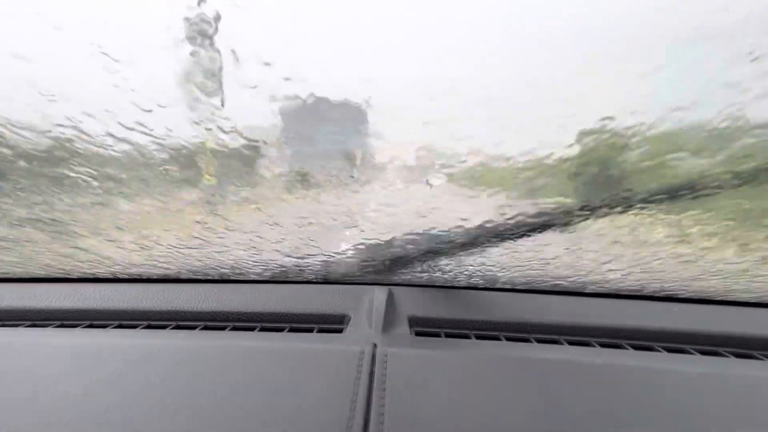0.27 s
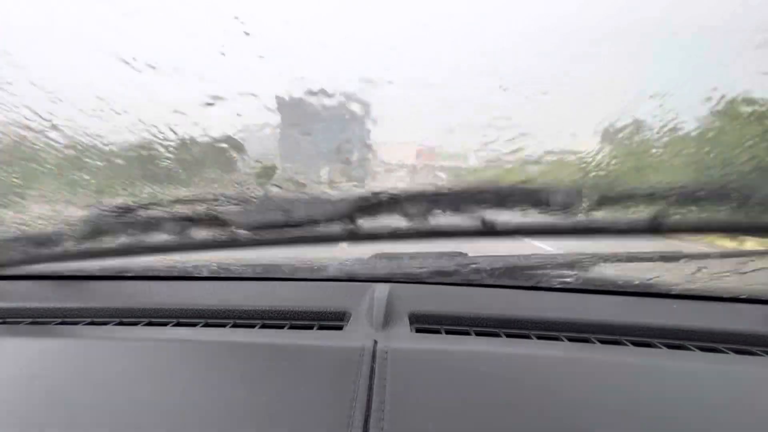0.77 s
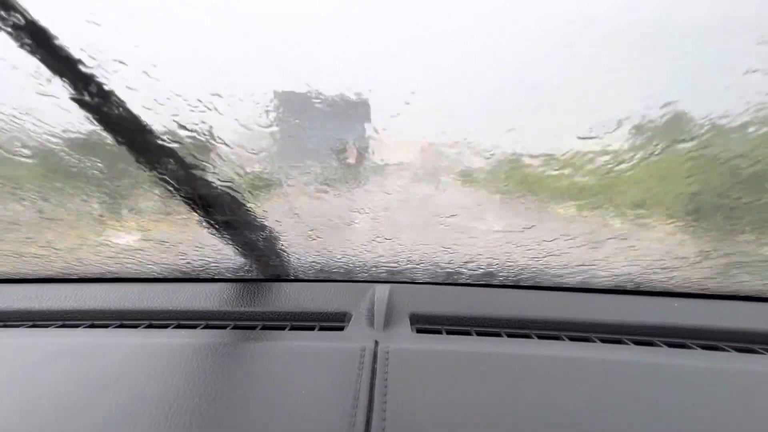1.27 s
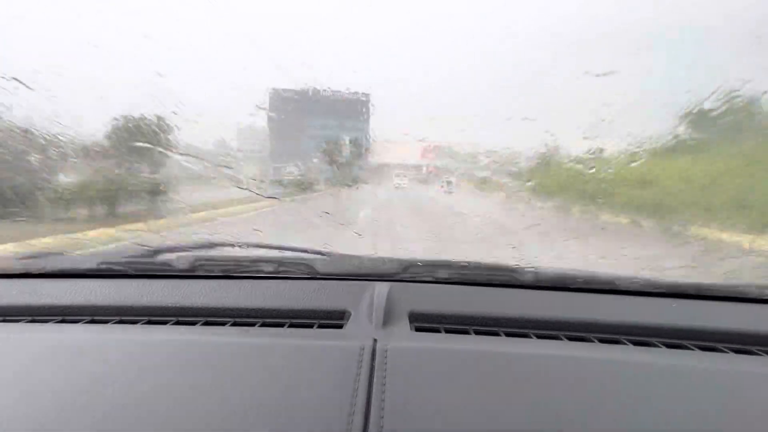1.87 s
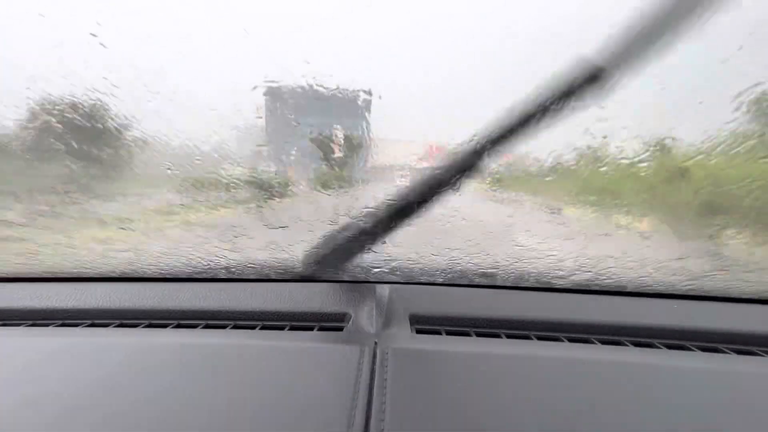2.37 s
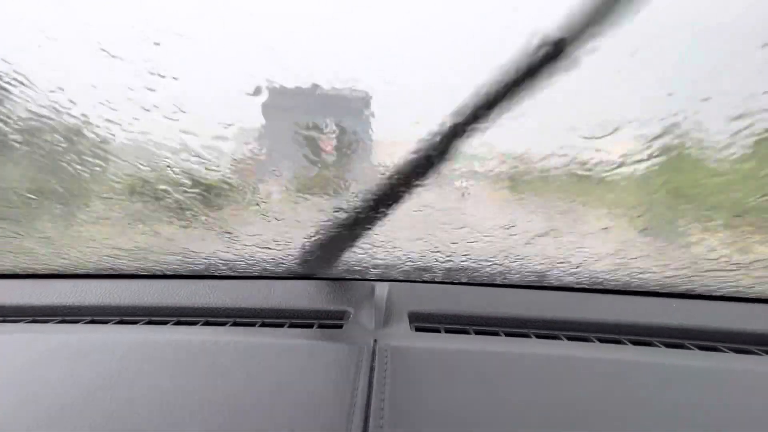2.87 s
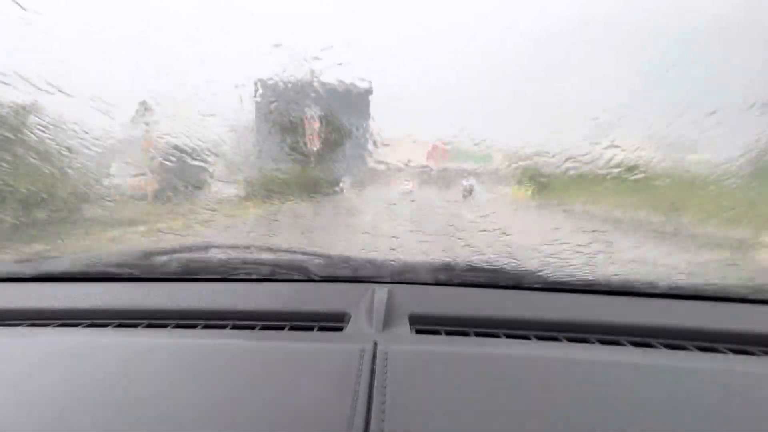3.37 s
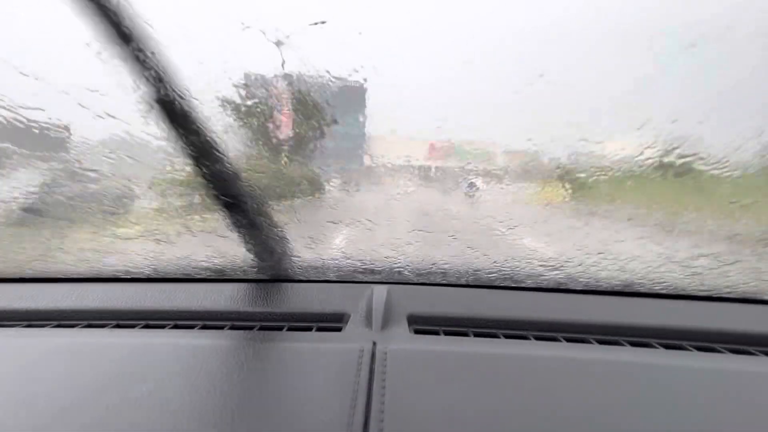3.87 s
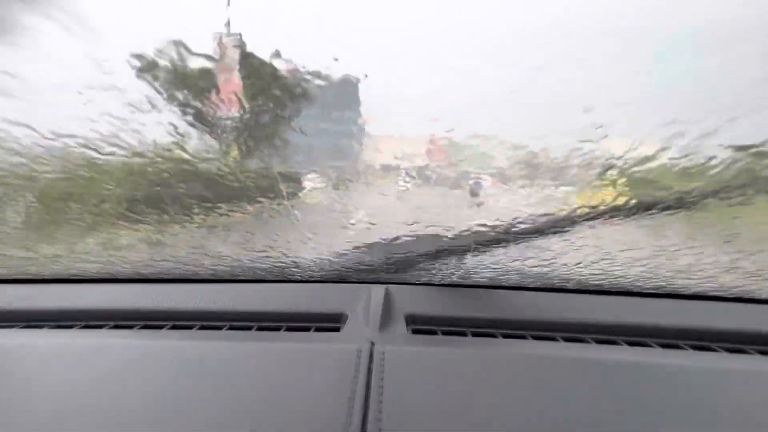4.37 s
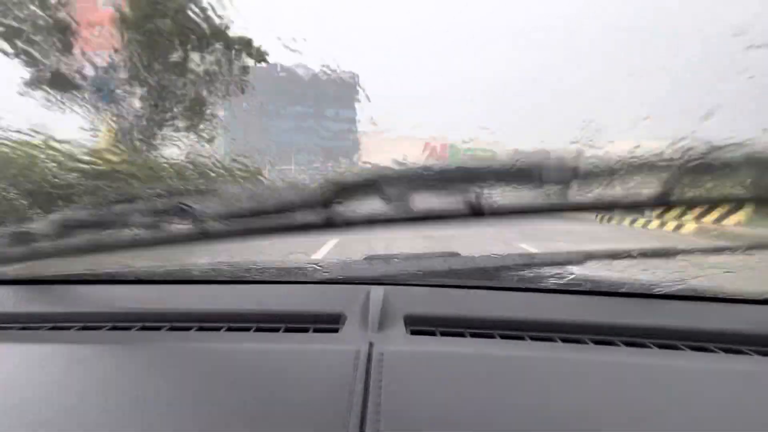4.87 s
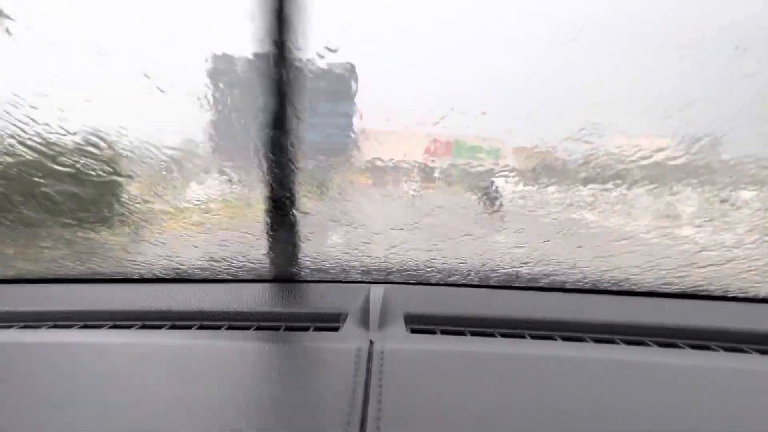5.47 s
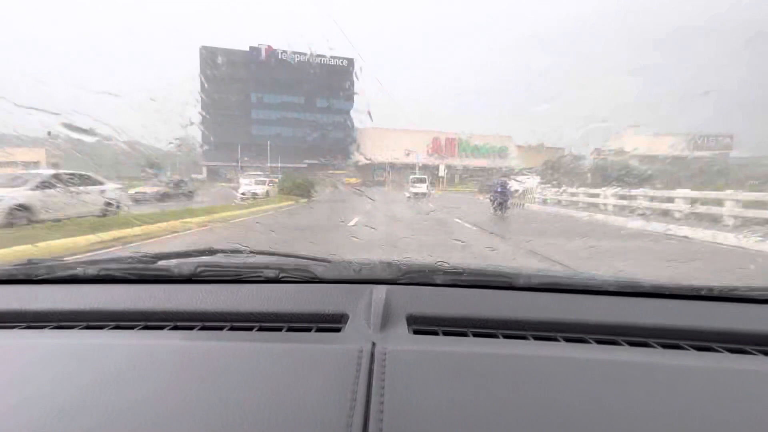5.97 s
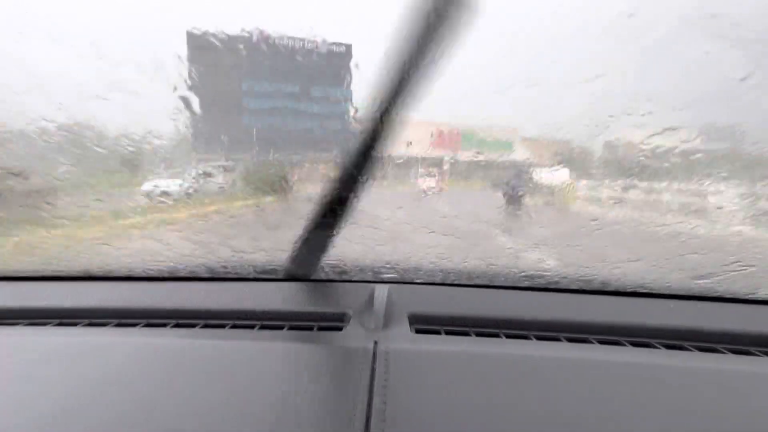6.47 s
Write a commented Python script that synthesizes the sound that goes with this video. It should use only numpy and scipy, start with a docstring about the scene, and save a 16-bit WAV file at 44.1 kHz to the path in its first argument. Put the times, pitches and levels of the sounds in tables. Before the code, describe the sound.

Inside a car driving through a downpour, dense bright rain patters in flurries on the windscreen while the steel roof drums overhead. A low engine hum and throbbing tyre rumble lie beneath, swelling halfway through. Fat drops tick on the glass; later come soft wiper thuds, wet slaps and dull body knocks as the rain slowly eases. Close, dry stereo cabin pickup, the glass patter brighter on the right.

```python
"""Inside a car driving through a downpour, heard by two microphones in the cabin. Thousands of drops a second
patter on the windscreen in flurries and ring the roof's steel, and fat ones tick on the glass. The engine hums
in wavering sines; filtered noise makes the tyres' rumble and wash, which swell from about 3 s. Wiper and water
thuds, slaps of water and dull knocks join in while the rain slowly eases."""
import sys
import numpy as np
from scipy import signal
from scipy.fft import rfft, irfft, next_fast_len
from scipy.io import wavfile
from scipy.ndimage import uniform_filter1d

SR = 44100
rng = np.random.default_rng(int(sys.argv[2]) if len(sys.argv) > 2 else 0)


def master(y):
    """Save y as 16-bit WAV."""
    cut = np.clip(np.atleast_2d(y).T, -1, 1)
    pcm = np.round(cut * 32767)  # scale
    wavfile.write(sys.argv[1], SR, pcm.astype(np.int16))


N = 296352
TIME = np.arange(N) / SR   # seconds
PADDED = next_fast_len(N + SR // 4)   # room for filter tails
FREQS = np.maximum(np.arange(PADDED // 2 + 1) * SR / PADDED, 1)   # Hz


def from_db(db):
    """Decibels to gain."""
    return 10 ** (np.asarray(db) / 20)


def in_time(rows):
    """Each column of a curve at every sample."""
    s, *columns = np.transpose(rows)
    return [np.interp(TIME, s, column) for column in columns]


def in_frequency(rows):
    """Each column of a spectrum at every frequency, interpolated along log frequency."""
    hz, *columns = np.transpose(rows)
    return np.array([np.interp(np.log(FREQS), np.log(hz), column) for column in columns])


def shaped(x, gain):
    """Filter by a gain per frequency."""
    return irfft(rfft(x, PADDED) * gain, PADDED)[..., :N]


def below(hz, order=8):
    """Low side of a power-preserving crossover."""
    return 1 / np.sqrt(1 + (FREQS / hz) ** (2 * order))


def above(hz, order=8):
    """High side of the same crossover."""
    return np.sqrt(1 - below(hz, order=order) ** 2)


def steadied(x, span_s):
    """Even out the slow level of a stereo sound to rms 1 in the mean of its channels."""
    size = max(int(span_s * SR), 2)
    power = x.mean(axis=0) ** 2
    power = uniform_filter1d(uniform_filter1d(power, size), size)
    return x / np.sqrt(np.abs(power) + 1e-20)


def pair(mid, side, likeness):
    """Left and right from two unrelated sounds; likeness -1 is opposite phase."""
    c = np.clip(likeness, -1, 1)
    return np.sqrt(1 + c) * mid + np.sqrt(1 - c) * side * np.array([[1], [-1]])


def to_right(db):
    """Channel gains that favour the right by db."""
    return from_db([[-db / 2], [db / 2]])


def drift(per_s):
    """Smooth random wandering with spread 1, low-passed at per_s Hz."""
    slow = shaped(rng.standard_normal(PADDED), below(per_s, order=2))
    return slow / np.std(slow)


def bell(s, half_s):
    """A smooth rise and fall of height 1, down to 1/e half_s away from s."""
    return np.exp(-((TIME - s) / half_s) ** 2)


def swells(rows):
    """Sum of bell-shaped level changes in dB."""
    return sum(db * bell(s, half_s) for s, half_s, db in rows)


def swing(db):
    """A level curve relative to its mean."""
    return db - db.mean()


def clicks(rows):
    """One single-sample click for each row of time and level."""
    s, db = np.transpose(rows)
    return np.bincount((s * SR).astype(int), from_db(db), N)


def drops(per_s, spread_db, largest):
    """Impacts at random moments: many small, few large."""
    count = int(per_s * N / SR)
    when, size, sign = rng.random((count, 3)).T
    size_db = spread_db * np.minimum(-np.log(1 - size), largest)
    strength = from_db(size_db) * np.sign(sign - .5)
    return np.bincount((when * N).astype(int), strength, N)


def splat(decay_s, cabin_db, cabin_t60_s, size=2048):
    """One spot's response at each microphone: a brief burst of bending waves over cabin reflections."""
    t = TIME[:size]
    envelope = np.exp(-t / decay_s) + from_db(cabin_db - 60 * t / cabin_t60_s)
    burst = rng.standard_normal((2, size)) * envelope
    return burst / np.sqrt(np.sum(burst ** 2, axis=1, keepdims=True))


# Resonances that come and go, on the roof and in the pane: spread in dB, cutoff of the wander in Hz.
RING_WANDER_DB, RING_WANDER_PER_S = .9, 1.5


# The road shaking the car. Each row: time in seconds, then the levels of cabin boom, tyre drone and
# body noise in dB, before each band's trim.
ROAD = [(0, -21, -22, -27.5), (0.55, -23, -22.5, -31), (0.9, -22.5, -29.5, -30), (1.6, -28, -26, -29),
        (2.15, -24.5, -22.5, -29.5), (2.55, -22.5, -24.5, -28.5), (3.0, -16, -18, -27),
        (3.55, -20, -18.5, -25.5), (3.9, -17, -17, -25.5), (4.4, -18.5, -18, -24.5), (4.8, -17, -20.5, -27),
        (5.5, -17.8, -19, -28), (5.8, -18, -22.5, -28), (6.72, -22.5, -20.5, -27.5)]
# Bumps in the road that swell the rumble. Each row: time of the height in seconds, half-length in seconds,
# lift of the boom in dB, lift of the drone in dB.
BUMPS = [(.48, .07, 3, 3), (.65, 0.055, 8, 2), (.92, 0.036, 6, 1), (1.25, .03, 2, 7.5), (1.78, 0.044, 4, 0),
         (2.2, .04, 1, 2), (2.92, 0.072, 2, 2.5), (3.12, .05, 1.5, 1), (3.33, 0.029, 11.5, -0.5),
         (3.62, .03, 1, 5.5), (3.74, .03, 4, 2), (3.88, 0.039, -7, 3), (4.14, 0.036, 5, -1),
         (4.24, .04, 5, 0), (4.37, .04, 2, 4), (4.51, 0.039, 7, 0), (4.74, .03, 3.5, 1.5),
         (4.83, .04, -2, 5.5), (4.98, .035, 5.5, -0.5), (5.12, 0.037, 0.5, 1), (5.23, .03, 3, 0),
         (5.39, .055, 8, -0.5), (5.61, .04, 5, 6), (6.1, .05, 2, 1), (6.38, .06, 4, 2.5),
         (6.71, 0.046, 12.5, 0.5)]
# The rumble drops briefly. Each row: time of the deepest point in seconds, half-length in seconds,
# change of the boom in dB, change of the drone in dB.
RUMBLE_DIPS = [(.1, 0.091, -9.5, -0.5), (.37, 0.029, -10, -0.5), (1.61, 0.056, -9, 1.5),
               (2.6, .03, -9, -0.5), (3.52, .03, 1, -3), (4.68, 0.037, -1, -7.5), (5.74, .035, 2, -7),
               (5.95, .025, -7, -1), (6.2, 0.037, -2, -5), (6.52, 0.035, -6, -5)]


def road_levels():
    """Levels of boom, drone and body noise in dB, with the bumps and dips."""
    boom_db, drone_db, body_db = in_time(ROAD)
    for s, half_s, boom_lift_db, drone_lift_db in list(BUMPS) + list(RUMBLE_DIPS):
        shape = bell(s, half_s)
        boom_db = boom_db + boom_lift_db * shape
        drone_db = drone_db + drone_lift_db * shape
    return boom_db, drone_db, body_db


# Colour of the road noise in the cabin. Each row: frequency in Hz, relative density in dB per Hz.
CABIN = [(18, -29), (28, -12), (36, -8), (47, 4), (54, -2), (61, 1), (72, -12.5), (90, -3), (101, -6),
         (112, -4), (140, -17), (165, -21.5), (187, -14), (199, -19.5), (212, -17), (260, -26),
         (400, -27.5), (520, -30.5), (800, -35)]
# Road noise at the two microphones. Each row: frequency in Hz, likeness from -1 to 1.
CABIN_LIKENESS = [(50, 1), (80, 0.68), (130, 0.37), (200, 0.79), (300, 0.15), (450, 0.041), (530, -0.76),
                  (700, 0.28)]
# Water thrown up by the tyres. Each row: time in seconds, level in dB before a small trim.
WASH = [(0, -35), (1.05, -36.0), (2.05, -38), (2.9, -35.5), (4.8, -35.5), (5.2, -37.5), (6.72, -39)]
# Uneven asphalt makes the rumble throb: spread in dB, cutoff in Hz.
THROB_DB, THROB_PER_S = 0.76, 6.9


def road():
    """Rough asphalt shakes the body, the cabin's air modes pick out the boom, and water washes the arches."""
    boom_db, drone_db, body_db = road_levels()
    wash_db, = in_time(WASH)
    mid, side = rfft(rng.standard_normal((2, PADDED)))
    colour = from_db(in_frequency(CABIN)) * above(14, order=3) * below(790, order=6)
    noise = pair(mid, side, in_frequency(CABIN_LIKENESS)) * colour
    bands = below(72), above(72) * below(150), above(150) * below(300), above(300)
    boom, drone, body, wash = (irfft(noise * band, PADDED)[:, :N] for band in bands)
    rumble = from_db(boom_db - 2.0) * steadied(boom, 0.078) * to_right(1.8)
    rumble += from_db(drone_db - 1.7) * steadied(drone, 0.11) * to_right(2.3)
    rumble += from_db(body_db - 1.67) * steadied(body, 0.17) * to_right(3.3)
    throb = from_db(THROB_DB * drift(THROB_PER_S))
    return throb * rumble + from_db(wash_db - 0.23) * steadied(wash, 0.27) * to_right(1.4)


# Engine hum. Each row: multiple of the firing rate, level in dB.
ENGINE = [(1, -29), (2, -35.5), (4, -38)]
ENGINE_HZ, ENGINE_WANDER = 46.93, 0.01517   # firing rate, and the share by which it wavers
ENGINE_WAVER_DB, ENGINE_FOLLOWS = 1.85, 0.75   # chance swing of each tone; dB per dB of cabin boom


def engine():
    """A low wavering hum of firing-rate multiples that swells with the cabin's boom."""
    boom_db = road_levels()[0]
    rate_hz = ENGINE_HZ * (1 + ENGINE_WANDER * drift(3.05))
    phase = 2 * np.pi * np.cumsum(rate_hz) / SR
    hum = 0
    for multiple, db in ENGINE:
        hum = hum + from_db(db + ENGINE_WAVER_DB * drift(2.2)) * np.sin(round(multiple) * phase)
    follow = from_db(ENGINE_FOLLOWS * swing(boom_db))
    return np.sqrt(2) * hum * follow * to_right(2.3)


def rain_on_glass(per_s, spread_db, largest, decay_s, cabin_db, cabin_t60_s, count=10):
    """Drops shared among spots on the pane, each with its own response and side; together they sound white."""
    leans = np.linspace(-1, 1, count)
    spots = rfft([splat(decay_s, cabin_db, cabin_t60_s) * to_right(3 * lean) for lean in leans])
    spots = irfft(spots / np.sqrt(np.mean(np.abs(spots) ** 2, axis=0)))
    out = np.zeros((2, N))
    for response in spots:
        # Whitening spreads sound ahead of the impact; the shift brings it round from the end.
        response = np.roll(response, response.shape[1] // 16, axis=1)
        impacts = drops(per_s / count, spread_db, largest)
        out += signal.oaconvolve(impacts[None], response, axes=1)[:, :N]
    return out


# Resonances of the windscreen. Each row: frequency in Hz, width in Hz, mean lift in dB.
PANE = [(1770, 50, 2), (2040, 60, 1.5), (2740, 60, 1.8), (3260, 160, 2), (3740, 130, 1.3), (4380, 180, 1)]


def pane(patter):
    """The windscreen's resonances colour the patter, each slowly waxing and waning."""
    out = patter
    for hz, width_hz, db in PANE:
        lift = from_db(db + RING_WANDER_DB * drift(RING_WANDER_PER_S)) - 1
        resonance = 1 / (1 + 2j * (FREQS - hz) / width_hz)
        out = out + lift * shaped(patter, resonance)
    return out


# How hard the rain falls on the glass. Each row: time in seconds, level in dB before PATTER_DB.
RAIN = [(0, -29.5), (0.33, -32.2), (0.49, -30), (0.8, -31.5), (1.16, -29.5), (1.185, -31.5), (1.7, -34),
        (2.0, -34), (2.78, -30.5), (3.0, -34.0), (3.45, -32.5), (4.35, -34.5), (4.8, -33.5), (5.3, -35.0),
        (5.99, -41), (6.08, -35.5), (6.72, -37.0)]
# Flurries blown against the windscreen. Each row: time of the height in seconds, half-length in seconds,
# lift in dB.
FLURRIES = [(1.89, 0.048, 3.5), (2.13, 0.055, 2.8), (2.28, 0.034, 3.5), (2.44, 0.034, 1.8),
            (2.65, .025, 1.5), (3.22, 0.014, 3), (3.95, 0.092, 2), (4.54, 0.02, 1.5), (5.25, 0.054, 1),
            (5.65, 0.11, 2), (5.86, 0.015, 3.5), (6.17, .06, 1)]
# Brief lulls in the patter. Each row: time of the deepest point in seconds, half-length in seconds,
# dip in dB.
LULLS = [(1.2, 0.022, -2.6), (2.0, .025, -2), (2.52, 0.041, -1), (5.12, 0.063, -1.5), (6.3, 0.034, -3.5)]
# Colour of drops on the windscreen. Each row: frequency in Hz, relative left and right levels in dB.
GLASS = [(500, -20, -18), (1200, -11.5, -6.5), (1900, -7.8, -4.8), (2450, -9, -6.4), (2850, -9, -5.2),
         (3400, -8.8, -2.7), (3750, -9.8, -0.9), (4500, -11.2, -0.6), (5200, -14.6, -2.6),
         (5900, -16.6, -6.9), (7500, -17.6, -11.9), (9000, -18.2, -17.2), (10000, -18.8, -20),
         (12000, -27.5, -27.5), (15500, -29.5, -29.5)]
# The patter at the two microphones. Each row: frequency in Hz, likeness from -1 to 1.
GLASS_LIKENESS = [(8000, 0), (9600, .3), (11500, -.55), (13000, -.55), (15500, .1)]
PATTER_DB = 0.98   # added to the rain curve
FLUTTER_DB, FLUTTER_PER_S = 0.6, 16   # chance unevenness of the rain: spread in dB, cutoff in Hz
LOW_FOLLOWS, SPRAY_FOLLOWS = 0.74, 1.38   # low tones and fine spray: dB per dB of patter
SPRAY_FLICKER_DB, SPRAY_FLICKER_PER_S = 1, 37   # spray arrives in small clumps: spread in dB, cutoff in Hz


def windscreen():
    """Dense patter; harder rain is brighter, so fine spray swings most and the pane's low tones least."""
    rain_db, = in_time(RAIN)
    flutter_db = FLUTTER_DB * drift(FLUTTER_PER_S)
    patter_db = rain_db + PATTER_DB + swells(FLURRIES) + swells(LULLS) + flutter_db
    patter = rain_on_glass(per_s=4200, spread_db=2.0, largest=6.6,
                           decay_s=0.00084, cabin_db=-10, cabin_t60_s=0.056)
    left, right = rfft(patter, PADDED)
    colour = from_db(in_frequency(GLASS)) * above(470, order=2)
    stereo = pair(left + right, left - right, in_frequency(GLASS_LIKENESS)) * colour
    glass = steadied(pane(irfft(stereo, PADDED)[:, :N]), 0.18)
    low = shaped(glass, below(2900, order=4) ** 2)
    spray = shaped(glass, above(6800, order=4) ** 2)
    middle = glass - low - spray
    low_db = (LOW_FOLLOWS - 1) * swing(patter_db)
    spray_db = (SPRAY_FOLLOWS - 1) * swing(patter_db) + SPRAY_FLICKER_DB * drift(SPRAY_FLICKER_PER_S)
    return from_db(patter_db) * (from_db(low_db) * low + middle + from_db(spray_db) * spray)


# Roof panel modes. Each row: frequency in Hz, width in Hz, mean level in dB, left-right likeness from -1 to 1.
ROOF = [(702, 59, -0.5, -0.75), (838, 51, 0.2, -0.84), (941, 36, -0.5, -0.72), (1045, 65, -5.5, 0.026),
        (1217, 52, -1.5, -0.31), (1393, 92, -4, 0.38), (1496, 80, -4.5, -0.87), (1593, 58, -9, -0.88)]


def panel(impacts):
    """The roof's damped steel rings; most modes reach the two microphones largely in opposite phase."""
    out = np.zeros((2, N))
    for hz, width_hz, db, likeness in ROOF:
        r = np.exp(-np.pi * width_hz / SR)
        # Where a drop lands sets how hard it drives each mode.
        blows = impacts * rng.standard_normal((2, N))
        poles = [1, -2 * r * np.cos(2 * np.pi * hz / SR), r * r]
        mid, side = signal.lfilter([1 - r, 0, r - 1], poles, blows + 1e-18)
        level = from_db(db + RING_WANDER_DB * drift(RING_WANDER_PER_S))
        out += level * pair(mid, side, likeness)
    return shaped(out, above(420, order=3) * below(1820, order=3))   # the headlining swallows the treble


# Drumming on the roof. Each row: time in seconds, level in dB before a trim.
ROOF_RAIN = [(0, -37), (1.15, -36.0), (1.35, -40), (1.7, -39.0), (2.2, -37.5), (3.5, -38), (4.0, -39),
             (4.95, -39), (6.0, -43), (6.15, -41), (6.72, -41.5)]
# Water splashing on the roof. Each row: time of the height in seconds, half-length in seconds, level in dB,
# top of its sound in Hz.
SPLASHES = [(0.34, .04, -38, 1000), (3.44, .025, -37, 1500), (3.64, .018, -36, 1000),
            (4.08, .015, -38, 1000), (4.34, .015, -37, 1000), (6.19, .04, -42, 1600), (6.4, .05, -39, 1500)]


def roof():
    """A dense drumming, and soft noise-driven splashes in which many drops land together."""
    roof_db, = in_time(ROOF_RAIN)
    drumming = panel(drops(per_s=2200, spread_db=3.0, largest=3.5))
    out = from_db(roof_db - 2.5) * steadied(drumming, 0.37)
    sheet = panel(rng.standard_normal(N))
    for s, half_s, db, top_hz in SPLASHES:
        splash = shaped(sheet, below(top_hz, order=4))
        out = out + from_db(db) * bell(s, half_s) * splash / np.std(splash)
    return out * to_right(1.3)


# Fat drops on the glass. Each row: start in seconds, relative strength in dB, change of the top treble in dB.
FAT_DROPS = [(0.1221, -23, 0), (0.2194, -29, -4), (0.2853, -26, -12), (0.5107, -25, -6), (0.547, -24, -4),
             (0.628, -31, 6), (0.7098, -26, -9), (0.817, -25, -2), (0.9353, -26, -5), (1.1533, -21, -5),
             (1.4311, -25, 0), (1.446, -30, -2), (1.474, -26, -1), (2.4134, -25, -9), (2.6753, -22.5, -5),
             (2.7841, -26, -14), (2.861, -23, -3), (3.2071, -31, 2), (3.3273, -25, -4), (3.364, -24.5, -3),
             (3.4366, -27, -12), (3.471, -27, -10), (3.6187, -23, 3), (3.9963, -26, -3), (4.135, -26, -3),
             (4.1799, -24.5, -4), (4.5241, -26, -6), (4.6199, -26, -9), (4.7481, -25, -11),
             (4.792, -28, -1), (5.028, -26, 2), (5.1213, -25, -3), (5.1956, -31, -11), (5.3782, -30, 4),
             (5.6605, -27, -8), (5.8331, -33, -12), (5.862, -28, -5)]
# Colour of a fat drop's tick. Each row: frequency in Hz, left and right gains in dB.
TICK = [(700, -13, -11), (2500, -9, -6), (4500, -8.5, -1.5), (7000, -7.5, -3.5), (9500, -7.5, -7.5),
        (12000, -10, -10.5), (16000, -12, -12.5)]


def fat_drops():
    """Single large drops smack the glass as short noise bursts, each with its own share of top treble."""
    out = np.zeros((2, N))
    for s, db, treble_db in FAT_DROPS:
        tick = splat(decay_s=.001, cabin_db=-17, cabin_t60_s=.05)
        size, start = tick.shape[1], int(s * SR)
        hz = np.arange(size // 2 + 1) * SR / size
        lift_db = np.interp(hz, [8000, 12000], [0, treble_db])
        tick = irfft(rfft(tick) * from_db(lift_db))
        # 25 dB makes up for the burst's energy of 1 being spread over time.
        out[:, start:start + size] += from_db(db + 25) * tick[:, :N - start]
    return shaped(out, from_db(in_frequency(TICK)))


# Soft thuds at the foot of the glass: the wiper blades flip over at 3.34 and 4.72 s, and a gout of water thumps
# at 4.93 s. Each row: time of the height in seconds, half-length in seconds, level in dB.
THUDS = [(3.34, .02, -40), (4.722, .04, -38), (4.93, .025, -36)]
THUD_LOW_HZ, THUD_HIGH_HZ = 290, 477   # soft rubber gives a dull sound


def wipers():
    """The rubber blades turn over, and a gout of water thumps, with a soft, wet thud: a swell of narrow-band
    noise."""
    noise = pair(*rng.standard_normal((2, N)), likeness=.3)
    dull = shaped(noise, above(THUD_LOW_HZ, order=4) * below(THUD_HIGH_HZ, order=6))
    thuds = sum(from_db(db) * bell(s, half_s) for s, half_s, db in THUDS)
    return thuds * dull / np.std(dull)


# Gouts of water slap on the car's metal. Each row: start in seconds, strength in dB, pitch in Hz.
SLAPS = [(3.635, -30, 720), (4.714, -25.5, 740), (4.731, -26.5, 700), (4.912, -28, 690),
         (4.959, -21.8, 780)]
# A slap's ring. Each row: multiple of its pitch, level in dB, time to fall 60 dB in seconds.
SLAP_MODES = [(1, 0, .04), (1.56, -9, .05), (1.73, -12, .024)]
SLAP_RIGHT_DB, SLAP_ATTACK_S = 5, .002


def slaps():
    """Gouts of water land with a short, soft knock of damped metal modes."""
    t, out = TIME[:SR // 10], np.zeros(N)
    attack = 1 - np.exp(-t / SLAP_ATTACK_S)
    for s, db, pitch_hz in SLAPS:
        ring = sum(from_db(mode_db - 60 * t / t60) * np.sin(2 * np.pi * multiple * pitch_hz * t)
                   for multiple, mode_db, t60 in SLAP_MODES)
        out[int(s * SR):][:len(t)] += from_db(db) * ring * attack
    return out * to_right(SLAP_RIGHT_DB)


# Dull knocks in the body. Each row: start in seconds, strength in dB.
KNOCKS = [(3.863, -16.5), (4.255, -19), (4.272, -15.5), (6.078, -12.5), (6.115, -16)]
# Body modes. Each row: frequency in Hz, level in dB, time to fall 60 dB in seconds.
BODY = [(113, -1, 0.2), (144, 2, .05), (204, -4.5, 0.12), (259, -5, 0.069), (306, -15, 0.11)]
KNOCK_TOP_HZ = 330   # the jolts come through rubber mounts


def knocks():
    """Jolts ring the body's low, well-damped modes."""
    t = TIME[:SR // 4]
    ring = sum(from_db(db - 60 * t / t60) * np.sin(2 * np.pi * hz * t) for hz, db, t60 in BODY)
    rung = signal.oaconvolve(clicks(KNOCKS), ring)[:N]
    return shaped(rung, below(KNOCK_TOP_HZ, order=4)) * to_right(2.5)


def scene():
    """Road and engine below, rain above and ahead."""
    car = road() + engine() + knocks()
    rain = windscreen() + roof() + fat_drops() + slaps()
    return car + rain + wipers()


CUTOFF_HZ = 15900


def record(dry):
    """The microphones' signal: the highest peaks are rounded and the top is cut steeply."""
    rounded = dry / (1 + (dry / .95) ** 8) ** (1 / 8)
    return shaped(rounded, below(CUTOFF_HZ, order=60))


dry = scene()
out = record(dry)
master(out)
```